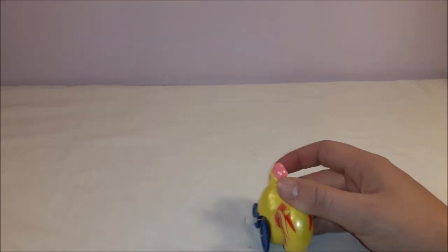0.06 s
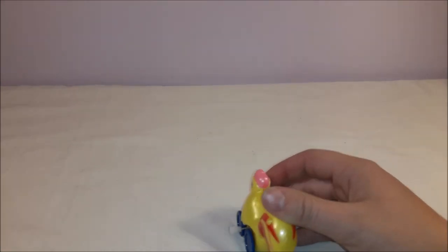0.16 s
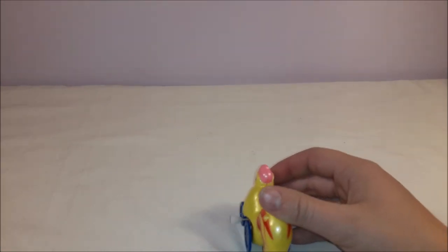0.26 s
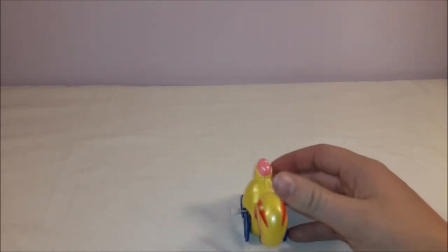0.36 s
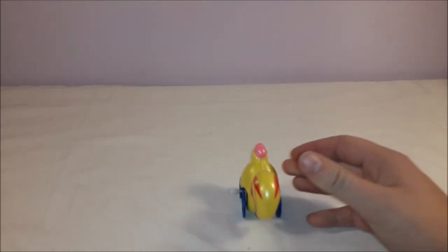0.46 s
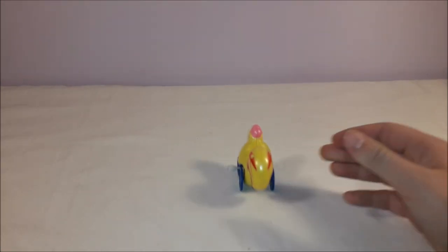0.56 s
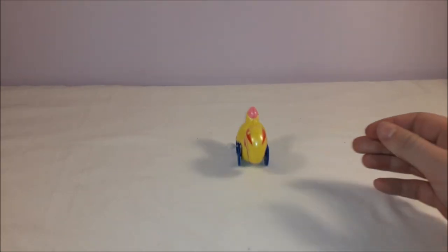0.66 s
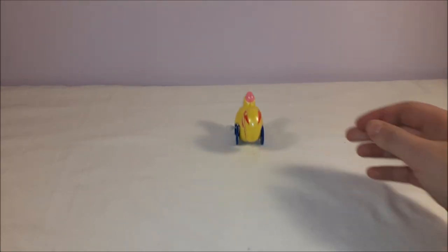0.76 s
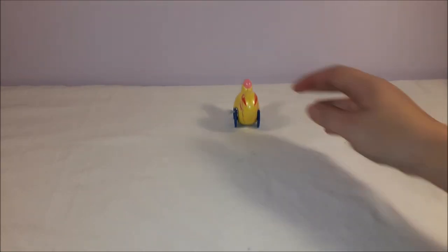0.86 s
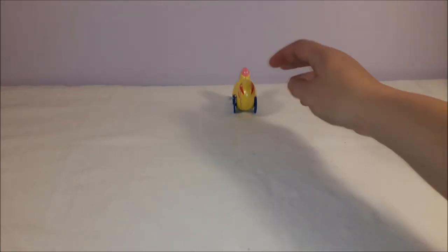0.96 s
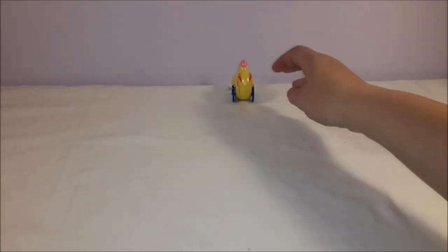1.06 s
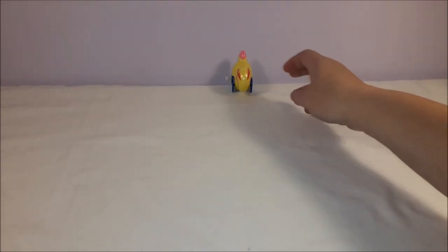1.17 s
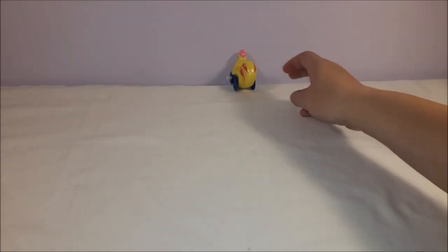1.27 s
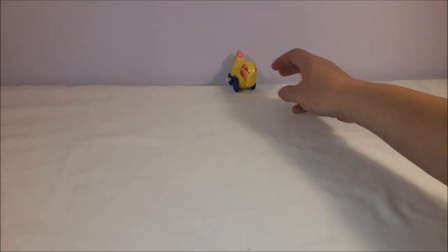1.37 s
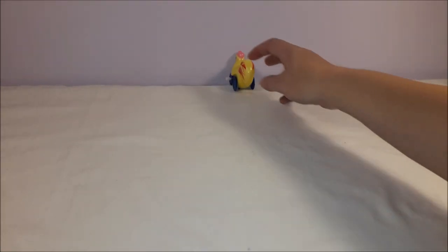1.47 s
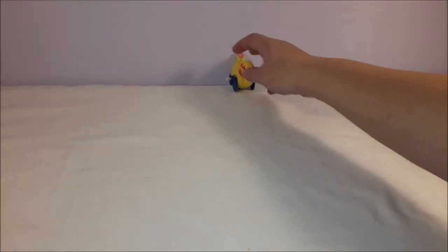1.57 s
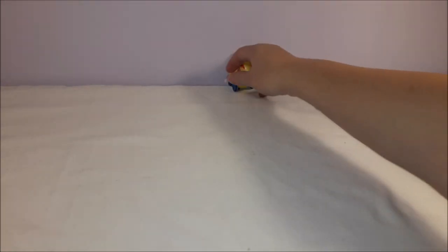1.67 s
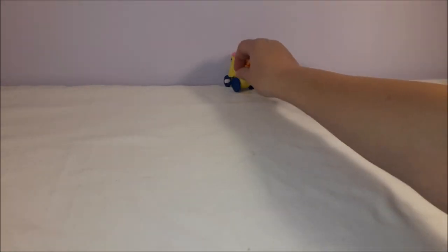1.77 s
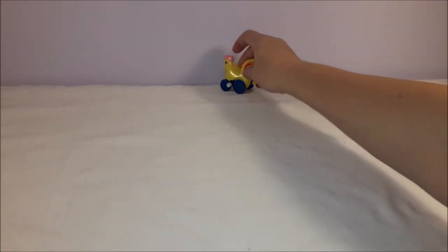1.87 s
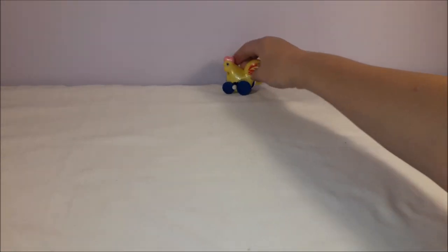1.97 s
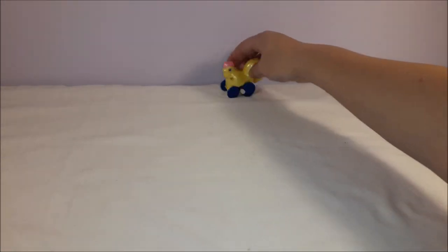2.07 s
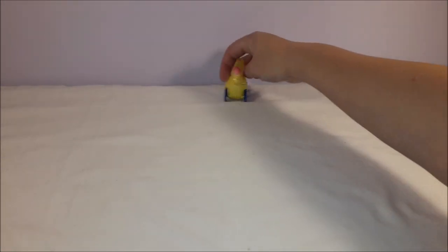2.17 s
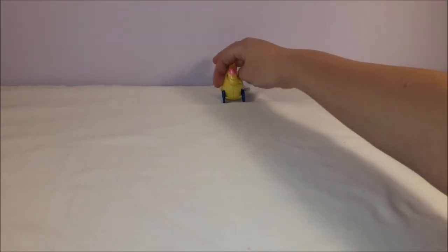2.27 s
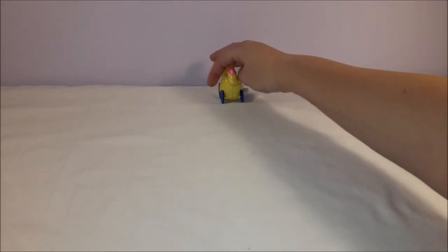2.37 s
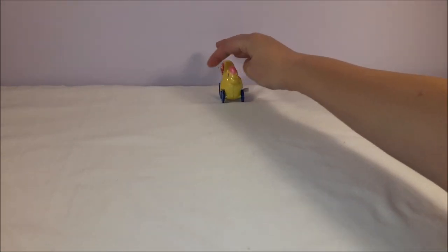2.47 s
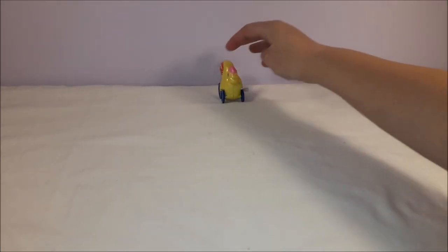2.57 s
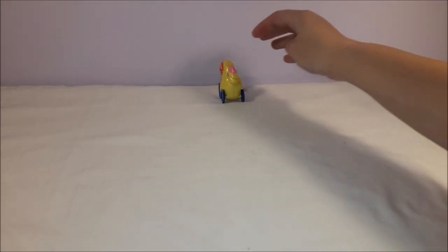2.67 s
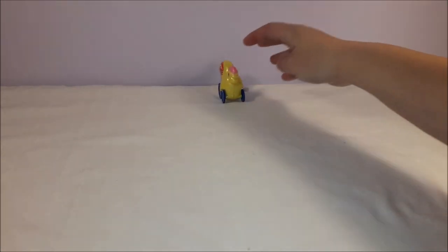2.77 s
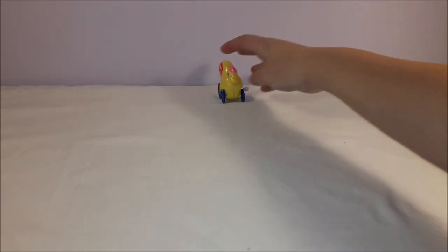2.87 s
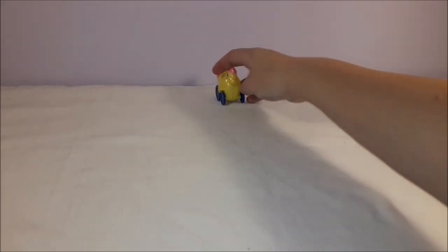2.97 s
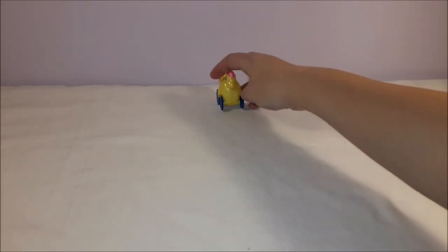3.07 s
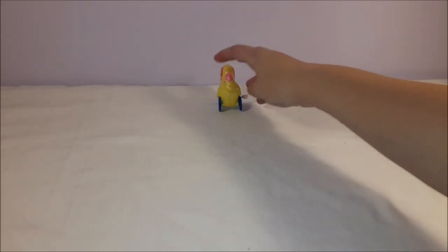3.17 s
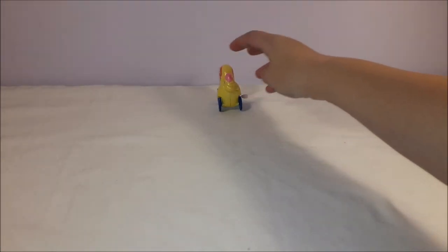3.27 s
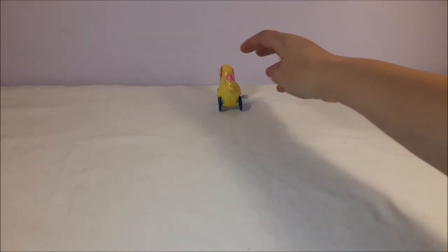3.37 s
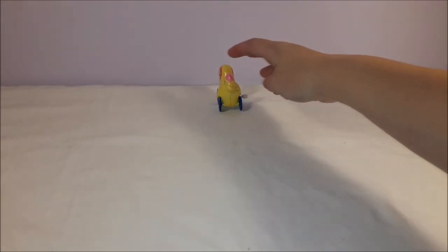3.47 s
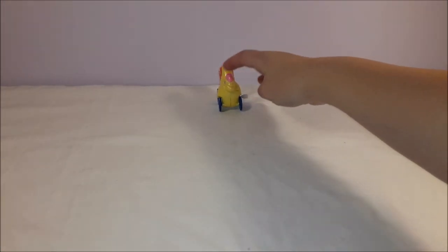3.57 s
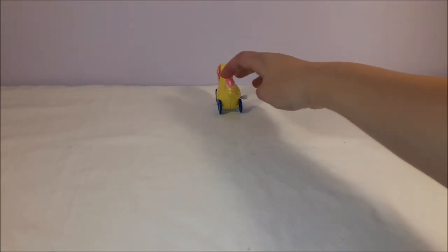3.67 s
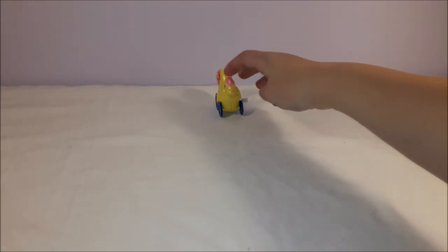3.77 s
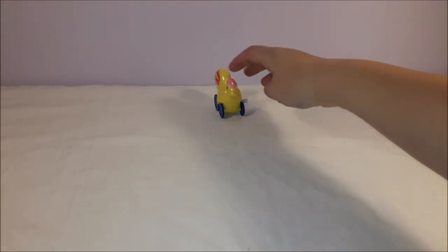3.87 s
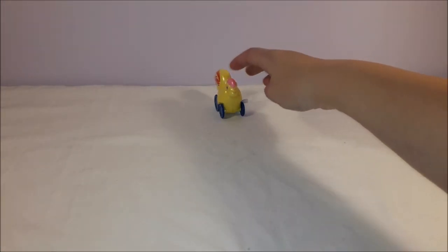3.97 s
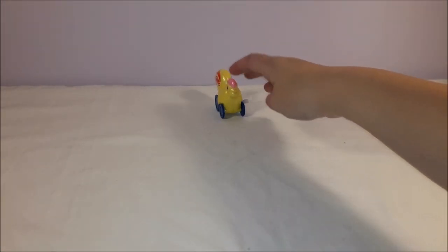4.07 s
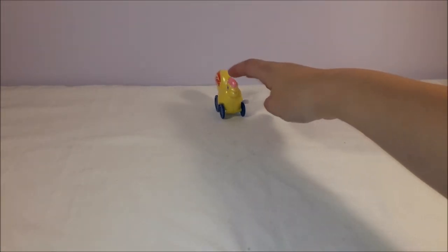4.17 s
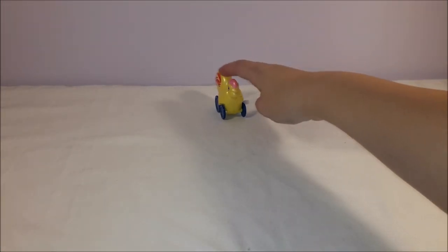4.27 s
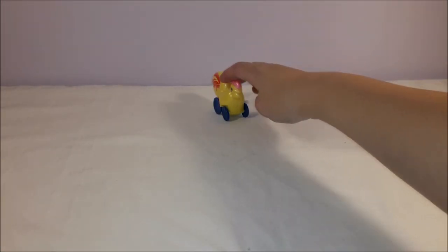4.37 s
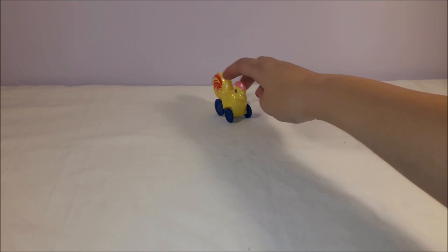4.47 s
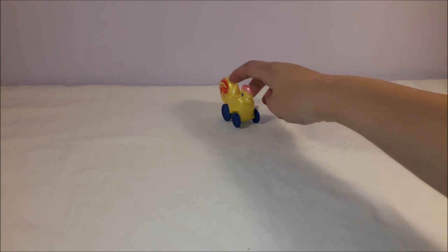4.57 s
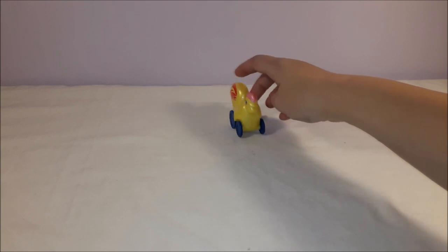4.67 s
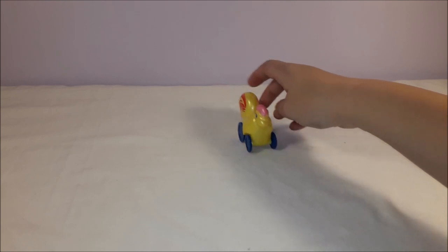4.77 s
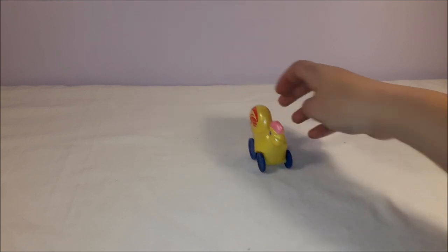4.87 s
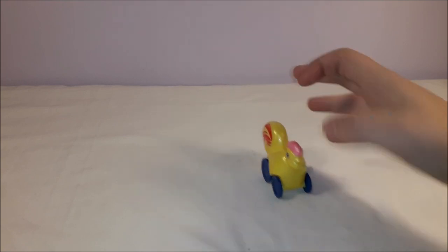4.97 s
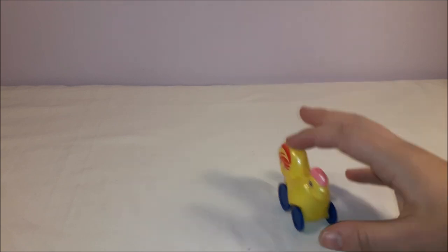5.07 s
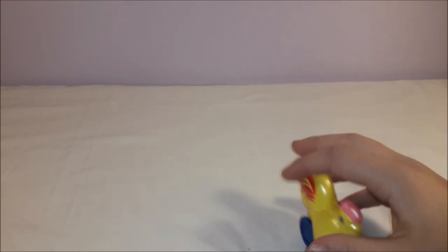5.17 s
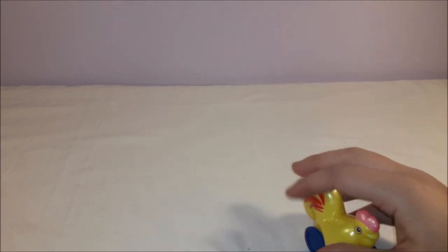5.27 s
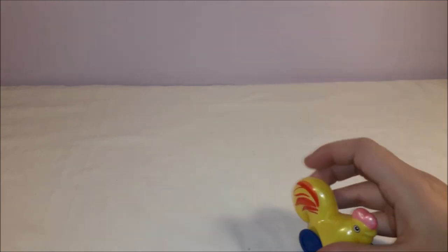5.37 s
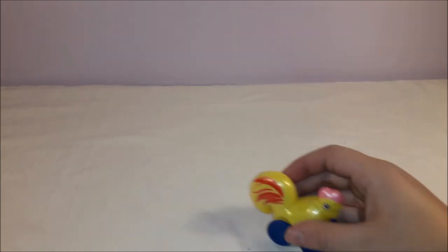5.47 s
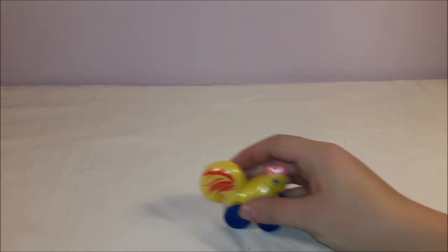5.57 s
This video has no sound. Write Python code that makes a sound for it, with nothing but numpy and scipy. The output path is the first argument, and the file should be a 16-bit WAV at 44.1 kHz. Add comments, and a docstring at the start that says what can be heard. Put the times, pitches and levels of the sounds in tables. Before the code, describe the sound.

Dry, bright whirr of tiny gears rattling inside a plastic shell, centred in a small, slightly live room with low hiss. One long run ends in a hard clack and knock; short choked bursts follow, then clicks and soft thuds of handling. The whirr resumes, repeatedly checked and released, its pitch dipping at each catch, until it cuts off and small clicks end the scene.

```python
"""A faint whirr, a clack and a knock, then a small plastic clockwork toy runs on a cloth-covered table.
A hand checks it and lets it go; it bumps the wall, is turned round, rolls back and is picked up.
Gear teeth strike several hundred times a second and rattle in the hollow shell, which rings.
Clacks are noise bursts through the same shell; knocks and thuds are dying sine modes.
A small room answers over steady hiss, with the toy straight ahead of the microphone."""
import sys
import numpy as np
from scipy import signal
from scipy.fft import rfft, irfft
from scipy.io import wavfile
from scipy.ndimage import uniform_filter1d

SR = 44100
rng = np.random.default_rng(int(sys.argv[2]) if len(sys.argv) > 2 else 0)


def transcribe(signal):
    """Save signal, clipped to [-1, 1], as a 16-bit WAV file at the path in sys.argv[1]."""
    frames = np.atleast_2d(signal).T
    limited = np.clip(frames, -1, 1)
    pcm = np.round(limited * 32767).astype(np.int16)
    wavfile.write(sys.argv[1], SR, pcm)


N = 248283
TIME = np.arange(N) / SR  # s

# Stretches of running, between checks and changes of grip. Each row: start in seconds, length in seconds,
# rise in seconds, relative level in dB, swell from start to end in dB, tooth rate it heads for in Hz,
# whine against the clatter in dB, lift of the low shell ring in dB, lift of the upper shell ring in dB.
RUNS = [(0.0, 0.056, 0.0049, -56, -13, 699.4, -13, -8, 5), (0.1, .04, 0.021, -24, -13, 752.5, -11, 0, 0),
        (0.144, 0.081, 0.058, -23.5, 5, 907, -11, 0.5, 1),
        (0.306, .046, 0.041, -34, -1.5, 694, -32, -0.5, -1.5),
        (0.382, .686, 0.11, -21.5, -1.5, 934.2, -19.5, -0.5, -1.5),
        (1.054, 0.064, 0.0095, -26.5, -1, 771.6, -5, 0, -2.5),
        (1.109, 0.16, .014, -24.5, -4.5, 860, -18, 0.5, -2),
        (1.274, 0.07, .008, -25.5, -0.5, 794, -22, -1.5, -0.5),
        (1.363, 0.096, 0.022, -29.5, -1, 739, -21, 0, -0.5),
        (1.482, 0.16, 0.013, -26.5, -3, 940, -31, 0.5, 1),
        (1.657, 0.073, 0.023, -26, -1.5, 824.6, -25, -0.5, 0),
        (1.798, 0.024, 0.0099, -44, 4, 656, -25, -8, 0.5),
        (2.081, 0.067, .02, -32.5, 3, 698, -30, -2.5, 0.5), (2.179, 0.026, .01, -43.5, 3, 645, -26, -6, -7),
        (2.262, .023, 0.011, -25.5, -10, 750, -32, -1, 1.5), (2.322, .052, .025, -43, -6, 700, -28, -6, -5),
        (2.405, 0.27, .014, -25, 0, 857.6, -12, -1, -1.5),
        (2.646, 0.23, .012, -25.5, 0.5, 861.5, -9, -6.5, 1.5),
        (2.877, 0.12, .014, -25, 1.5, 862, -6.5, -5, 3),
        (3.012, 0.077, 0.0085, -32.5, -2, 719.5, -9, -5.5, 0),
        (3.161, 0.51, .014, -24.5, -0.5, 877.3, -7.5, -2.5, 0),
        (3.666, 0.15, .008, -23, -0.5, 868.7, -21, -1.5, -0.5),
        (3.821, 0.13, 0.016, -25, -1, 839, -8, 0, 0.5), (3.959, .162, .018, -25, -1, 796, -9, -2.5, 1.5),
        (4.139, 0.077, 0.029, -23.5, 5.5, 902, -22, 0, 2.5),
        (4.224, 0.085, 0.011, -26.5, 4.5, 777.4, -4, -1.5, 2.5),
        (4.346, .041, .034, -23.5, -3, 797.5, -8, -1, 2), (4.396, 0.15, 0.021, -25, -5, 784, -6.5, 2, 0),
        (4.553, 0.093, 0.017, -27, 1.5, 690.5, -13.5, 2.5, -1),
        (4.644, 0.081, .03, -27, 2, 644, -7.5, -6, -2),
        (4.715, 0.22, 0.044, -22.5, 1.5, 827.7, -14.5, -1.5, -3.5),
        (4.94, 0.15, .012, -23, -1.5, 816.6, -9, -3.5, 2.5),
        (5.074, 0.19, 0.0092, -21.5, 3.5, 825.3, -12.5, 0, -3.5),
        (5.488, 0.031, 0.024, -30, 3, 693, -19, -4, 1.5),
        (5.62, 0.021, 0.0077, -32.5, 4, 694, -15, -10, -5)]
# An off-centre wheel sways the speed. Each row: time in seconds, depth as a share of the speed.
SWAY = [(0, 0.016), (2.3, 0.021), (2.5, 0.038), (3.7, 0.034), (4.5, .04), (5.0, .015), (5.63, 0.014)]
# Broad response of the hollow shell. Each row: frequency in Hz, relative level in dB.
SHELL = [(60, -66), (250, -58), (550, -56.5), (750, -33.5), (1100, -30), (1350, -22.5), (2200, -21.5),
         (3500, -17), (5500, -14.5), (7000, -10), (9300, -15), (11000, -10), (15600, -13.5)]
# Resonances standing out of that response. Each row: frequency in Hz, width in Hz, lift in dB.
SHELL_MODES = [(1395, 130, 6), (1638, 154, 17.5), (1837, 212, 8), (2742, 850, 8.5), (4057, 690, 8),
               (4510, 32, 9.5), (4800, 290, 9), (5360, 1080, 5.5), (6390, 150, 5), (6880, 540, 5),
               (7770, 1080, 7), (10560, 140, 2.5), (12100, 130, 8), (14560, 250, 7)]
# One ring shifts as the shell is held or set free. Each row: time in seconds, frequency in Hz.
SHIFTING_RING = [(0, 3030), (.75, 3040), (1.2, 2931), (1.35, 2890), (1.6, 2970), (1.8, 2975), (2.15, 2762),
                 (2.5, 2738), (2.75, 2931), (3.4, 2988), (3.7, 2969), (4.2, 2902), (5.05, 2873),
                 (5.63, 2986)]
# Where the grip lifts the low and the upper shell ring. Each row: frequency in Hz, share of the lift.
LOW_ZONE = [(1000, 0), (1400, 1), (2000, 1), (2300, 0)]
UPPER_ZONE = [(2100, 0), (2500, 1), (3200, 1), (3700, 0)]
# Rumble and hiss of room and microphone. Each row: frequency in Hz, relative level in dB.
FLOOR = [(20, -22), (60, 0), (100, 4), (140, 3), (250, -8), (500, -6), (1000, -12), (1600, -5), (3000, -4),
         (6200, -3), (6750, -2.5), (7400, -2), (10000, -15), (16000, -21)]
# How long the small room rings. Each row: frequency in Hz, time to fall by 60 dB in seconds.
ROOM = [(300, 0.33), (1500, 0.19), (4000, 0.18), (9000, 0.13), (16000, 0.11)]
# The toy bumps the wall or the fingers. Each row: start in seconds, relative peak level in dB.
KNOCKS = [(0.04, -56), (0.34, -63), (1.289, -34.5), (1.311, -24.5), (1.726, -27.5), (1.74, -32.5),
          (1.757, -35), (1.784, -77), (5.282, -47), (5.524, -42)]
# What rings in a knock. Each row: frequency in Hz, relative level in dB, time to fall by 60 dB in seconds.
KNOCK_MODES = [(300, -17, 0.029), (400, -13, 0.042), (550, -11, 0.088), (694, -4, 0.021), (930, -20, 0.046),
               (1054, 3.5, 0.027), (1205, 12, 0.014), (1414, 14.5, 0.022), (1910, -12, .01)]
# Sharp clacks of wheels and gears. Each row: start in seconds, relative peak level in dB.
CLACKS = [(0.0408, -27), (0.134, -29), (1.2898, 3), (1.398, -24), (1.7556, -7.5), (1.8185, -24),
          (1.944, -47), (2.0155, -31.5), (2.096, -15), (2.2432, -10.5), (2.2714, -3), (2.361, -17.5),
          (5.389, -28), (5.3946, -49), (5.415, -45), (5.5023, -23), (5.5256, -6)]
# The thin high ring. Each row: time in seconds, level in dB.
THIN_RING = [(1.7, -80), (1.87, -60), (2.03, -72), (2.12, -54), (2.2, -56), (2.4, -60), (2.6, -78)]
# Soft thuds on the table. Each row: start in seconds, relative peak level in dB.
THUDS = [(1.727, -59), (1.884, -65), (2.1, -56), (2.133, -62), (2.263, -54), (3.049, -61), (3.101, -70),
         (3.663, -57), (4.65, -70), (5.271, -77), (5.489, -65)]
# What rings in a thud. Each row: frequency in Hz, relative level in dB, time to fall by 60 dB in seconds.
THUD_MODES = [(86, -17, .08), (135.5, -6, 0.098), (202, -1, 0.043), (267, -7, 0.04), (430, -9, 0.047)]

EDGE_HZ = 15850  # upper limit of the recorder
STALL_HZ, BRAKE_S = 597.7, .05  # tooth rate the braked gears sink towards, and its time constant
SPIN_UP_RISES = 2.2  # time constant of the speed, in rises of the loudness
COAST_DB_PER_S = 480  # how fast the whirr dies when the gears are checked
LOUD_DB_PER_OCTAVE = 11  # the whirr is quieter while the gears are below their speed
HELD_DB, CREEP_DB = -65, 5  # the gears creep unevenly while the toy is held


def amp(db):
    """Decibels to gain."""
    return 10 ** (np.asarray(db) / 20)


def unit(x):
    """Scales to rms 1."""
    return x / np.sqrt(np.mean(x ** 2) + 1e-20)


def curve(rows):
    """The second column of a time table at every sample."""
    return np.interp(TIME, *np.transpose(rows))


def read(points, hz):
    """A spectrum table on a log-frequency axis."""
    f, value = np.transpose(points)
    return np.interp(np.log(hz + 1), np.log(f + 1), value)


def per_run(column, t):
    """A value that holds during each run and slides to the next one in the pause."""
    runs = np.asarray(RUNS)
    starts, ends = runs[:, 0], runs[:, 0] + runs[:, 1]
    edges = np.maximum.accumulate(np.ravel([starts, ends], "F"))
    return np.interp(t, edges, np.repeat(column, 2))


def add(mix, s, sound):
    """Lays a sound into the mix at time s."""
    part = mix[max(round(s * SR), 0):][:len(sound)]
    part += sound[:len(part)]


def wander(hz):
    """Smooth chance of rms 1, with little movement faster than hz."""
    f = np.fft.rfftfreq(N, 1 / SR)
    return unit(irfft(rfft(rng.standard_normal(N)) / (1 + (f / hz) ** 4), N))


def band(x, low_hz, high_hz):
    """The part of x between two frequencies, without delay."""
    sos = signal.butter(2, [low_hz, high_hz], "band", fs=SR, output="sos")
    return signal.sosfiltfilt(sos, x)


def motion():
    """Tooth rate and loudness: each run spins up from the speed that is left, holds, and is braked."""
    speed = np.full(N, float(STALL_HZ))
    gain = amp(HELD_DB + CREEP_DB * wander(40))
    for start, length, rise, level_db, swell_db, top_hz, *_ in RUNS:
        i = int(np.clip(round(start * SR), 0, N - 1))
        t = TIME[i:] - TIME[i]
        braked = np.maximum(t - length, 0)
        free = top_hz + (speed[i] - top_hz) * np.exp(-t / (SPIN_UP_RISES * rise))
        speed[i:] = STALL_HZ + (free - STALL_HZ) * np.exp(-braked / BRAKE_S)
        db = level_db + swell_db * (np.minimum(t / length, 1) - .5)
        db = db - COAST_DB_PER_S * braked
        db = db + LOUD_DB_PER_OCTAVE * np.log2(speed[i:] / top_hz)
        fade_in = np.sin(np.pi / 2 * np.minimum(t / rise, 1)) ** 2
        gain[i:] = np.maximum(gain[i:], fade_in * amp(db))
    return speed, gain


def gears(speed, whine_db, sway_hz=9.35, free_hz=830):
    """Force on the shell: tooth strikes, loose parts rattling, teeth sliding, and the whine of the mesh."""
    sway = np.sin(2 * np.pi * sway_hz * (TIME - 3.295))
    # below their free speed, the gears run more unevenly
    unsteady = .016 + .2 * np.maximum(1 - speed / free_hz, 0)
    rate = speed * (1 + curve(SWAY) * sway + unsteady * wander(70))
    teeth = np.cumsum(rate) / SR

    # play in the bearings makes each tooth land a little early or late
    landed = np.maximum.accumulate(np.floor(teeth + .055 * wander(400)))
    uneven_db = 3 * np.clip(rng.standard_normal(N), -2, 2)
    strikes = np.diff(landed, prepend=landed[0]) * amp(uneven_db)

    # loose parts: about 7000 random clicks a second, of either sign
    hits = (rng.random(N) < 7000 / SR) * rng.choice([-1, 1], N)
    rattle = hits * amp(2 * np.minimum(rng.exponential(1, N), 3))

    # sliding noise, strongest at the start of each tooth
    scrape = (0.46 + np.exp(-(teeth % 1) / 0.14)) * rng.standard_normal(N)

    # the tooth rate, its octave, and a second, faster pair of gears
    turn = 2 * np.pi * teeth
    mesh = np.cos(turn) + amp(-2.5) * np.cos(2 * turn) + amp(-7) * np.cos(1.5 * turn)
    whine = amp(whine_db + 2.5 * wander(4.7)) * mesh * (1 + 0.48 * wander(85))

    force = amp(-2) * unit(strikes - strikes.mean()) + unit(rattle) + amp(-1) * unit(scrape) + whine
    return unit(force * amp(0.2 * sway + 0.27 * wander(100)))


def shell_ring(size=4096):
    """The hollow shell's causal answer to one click, energy 1."""
    hz = abs(np.fft.fftfreq(size, 1 / SR))
    db = read(SHELL, hz)
    for f, width, lift in SHELL_MODES:
        db = db + lift / (1 + (2 * (hz - f) / width) ** 2)
    # minimum phase: the ring starts at once and has no pre-echo
    spectrum = np.exp(np.conj(signal.hilbert(np.log(amp(db)))))
    ring = np.fft.ifft(spectrum).real[:size // 2]
    return ring / np.linalg.norm(ring)


def radiate(x, low_db, upper_db, patchy_db=2.5, ring_db=11, ring_width_hz=260):
    """Grip and load shift the shell's rings; as the toy rocks and rolls, narrow bands swell and fade."""
    hz, t, z = signal.stft(x, SR, nperseg=512, noverlap=384)
    db = np.outer(read(LOW_ZONE, hz), per_run(low_db, t))
    db = db + np.outer(read(UPPER_ZONE, hz), per_run(upper_db, t))
    ring_hz = np.interp(t, *np.transpose(SHIFTING_RING))
    db = db + ring_db / (1 + (2 * (hz[:, None] - ring_hz) / ring_width_hz) ** 2)
    # chance smoothed over 2 bands and 50 frames, growing up to 4 kHz
    patches = uniform_filter1d(rng.standard_normal(z.shape), size=2, axis=0)
    patches = uniform_filter1d(patches, size=50, axis=1)
    db = db + patchy_db * unit(patches) * np.clip(hz / 4000, 0, 1)[:, None]
    return signal.istft(z * amp(db), SR, nperseg=512, noverlap=384)[1][:N]


def motor(ring):
    """The gears shake the shell, which radiates the whirr."""
    speed, gain = motion()
    *_, whine_db, low_db, upper_db = np.transpose(RUNS)
    force = gears(speed, per_run(whine_db, TIME))
    shaken = signal.oaconvolve(force, ring)[:N]
    return unit(radiate(shaken, low_db, upper_db)) * gain


def room(x, wet_db, gap=0.0046):
    """Dense reflections from table and walls, each band dying at its own speed."""
    size = SR // 2
    taps = rng.standard_normal(size) * (rng.random(size) < 4000 / SR)  # about 4000 a second
    taps = taps * (np.arange(size) > gap * SR)  # gap in seconds before the first reflection
    hz, t, z = signal.stft(taps, SR, nperseg=256)
    fade = amp(-60 * t / read(ROOM, hz)[:, None])
    tail = signal.istft(z * fade, SR, nperseg=256)[1]
    wet = signal.oaconvolve(x, tail / np.linalg.norm(tail))[:N]
    return (x + amp(wet_db) * wet) / np.sqrt(1 + amp(wet_db) ** 2)


def floor(level_db=-65):
    """Steady room rumble and hiss: noise shaped in frequency."""
    shape = amp(read(FLOOR, np.fft.rfftfreq(N, 1 / SR)))
    return amp(level_db) * unit(irfft(rfft(rng.standard_normal(N)) * shape, N))


def blows(events, modes, level_db, rise):
    """Each blow rings the same modes, in shares and phases drawn anew."""
    out, t = np.zeros(N), np.arange(SR // 4) / SR
    for s, db in events:
        ring = np.zeros(len(t))
        for hz, mode_db, t60 in modes:
            share, phase = rng.standard_normal(2)
            ring += amp(mode_db + 2 * share - 60 * t / t60) * np.sin(2 * np.pi * hz * t + phase)
        ring *= 1 - np.exp(-t / rise)  # rise in seconds: short for hard contact
        add(out, s, amp(db + level_db) * ring / abs(ring).max())
    return out


def knocks():
    """Hard bumps against wall or fingers: a sudden start and short, mostly middle modes."""
    return band(blows(KNOCKS, KNOCK_MODES, level_db=4, rise=0.00015), 296, 8000)


def clacks(ring, level_db=-10.5, decay=0.004):
    """A short burst of contact noise rings the shell."""
    out, t = np.zeros(N), np.arange(SR // 50) / SR
    for s, db in CLACKS:
        burst = rng.standard_normal(len(t)) * np.exp(-t / decay)
        click = signal.fftconvolve(burst, ring)
        add(out, s, amp(db + level_db) * click / abs(click).max())
    return band(out, 1400, 10300)


def thin_ring(hz=6750, width_hz=200):
    """A faint, thin high ring lingers while the toy is turned round: a tone with a wandering level."""
    tone = wander(width_hz) * np.cos(2 * np.pi * hz * TIME)
    return amp(curve(THIN_RING)) * unit(tone)


def thuds():
    """Soft thuds on the table: a gentler start and low modes."""
    return band(blows(THUDS, THUD_MODES, level_db=0.5, rise=0.0045), 55, 2000)


def scene():
    """Toy, bumps and room straight ahead, the same in both channels."""
    ring = shell_ring()
    whirr = room(motor(ring), wet_db=-11.5)
    clicks = room(clacks(ring), wet_db=-3)
    bumps = room(knocks() + thuds(), wet_db=-5.5)
    mono = whirr + clicks + bumps + thin_ring() + floor()
    return np.array([mono, mono])


def record(dry):
    """The recorder's band limit: a steep low-pass."""
    low_pass = signal.firwin(511, EDGE_HZ, window=("kaiser", 8), fs=SR)
    return signal.oaconvolve(dry, low_pass[None], "same")


dry = scene()
out = record(dry)
transcribe(out)
```